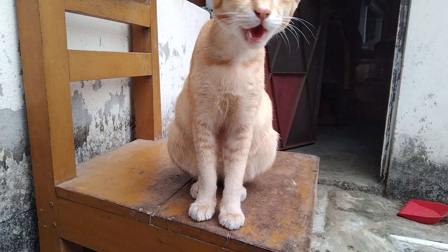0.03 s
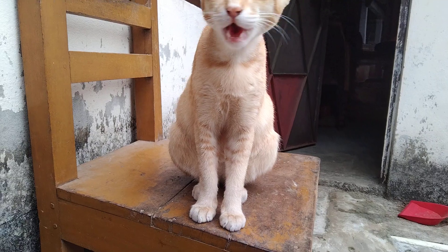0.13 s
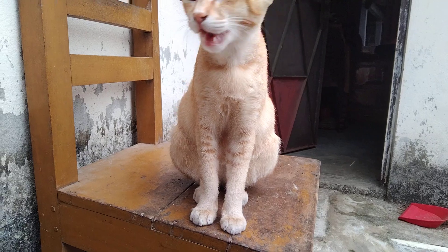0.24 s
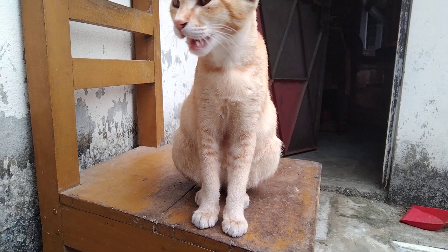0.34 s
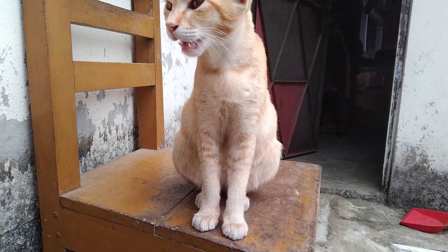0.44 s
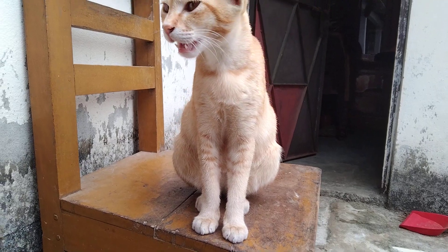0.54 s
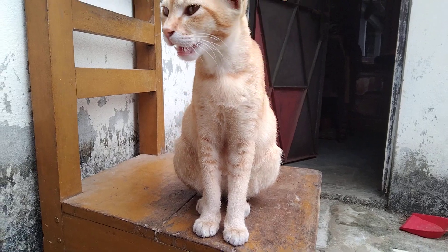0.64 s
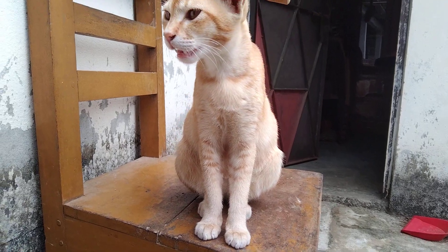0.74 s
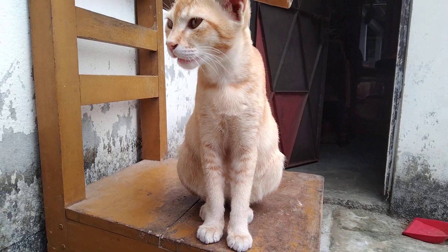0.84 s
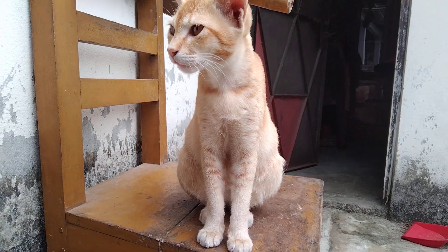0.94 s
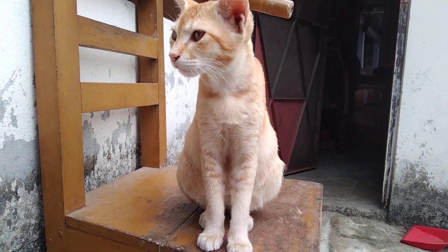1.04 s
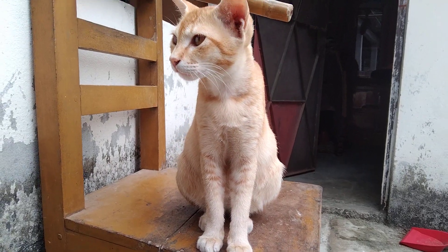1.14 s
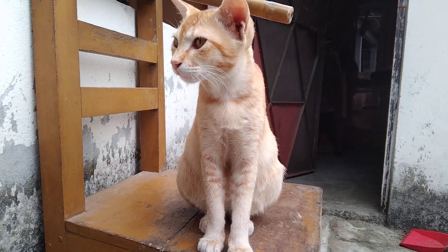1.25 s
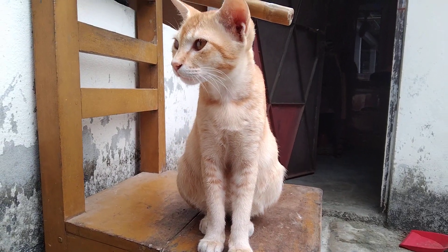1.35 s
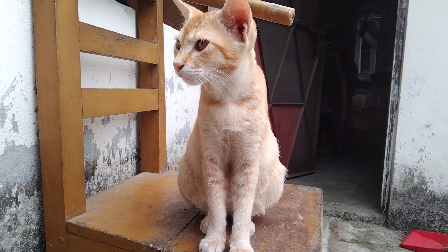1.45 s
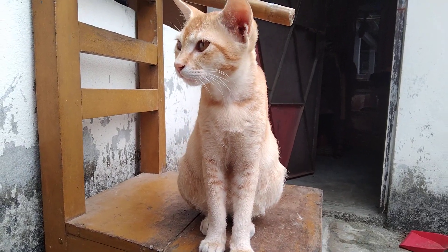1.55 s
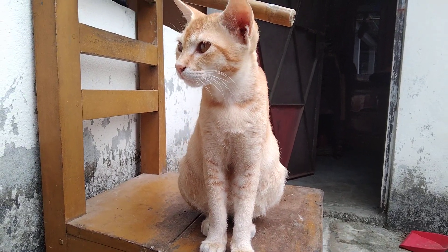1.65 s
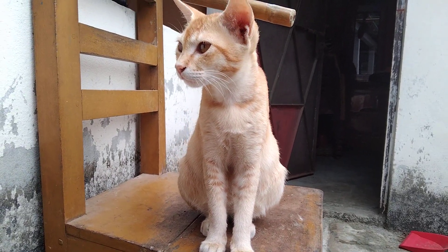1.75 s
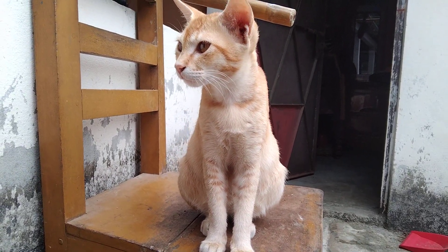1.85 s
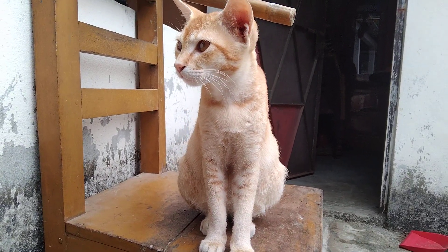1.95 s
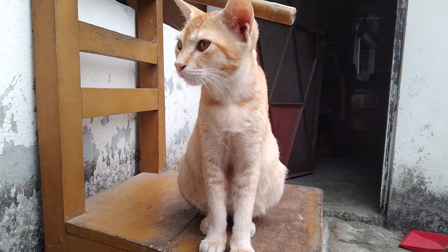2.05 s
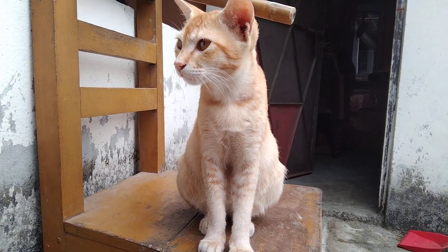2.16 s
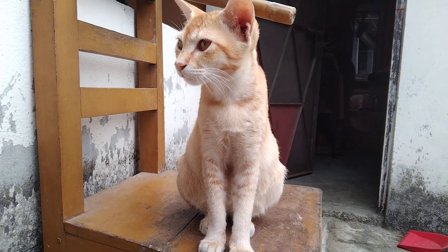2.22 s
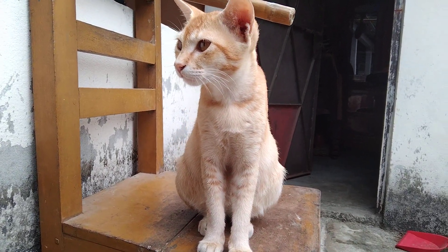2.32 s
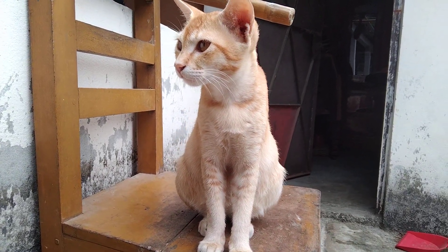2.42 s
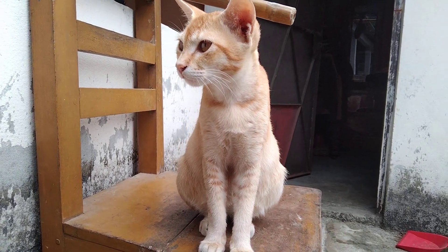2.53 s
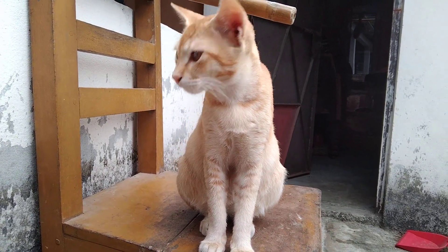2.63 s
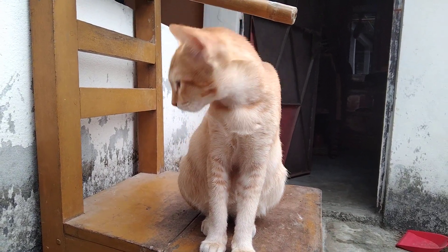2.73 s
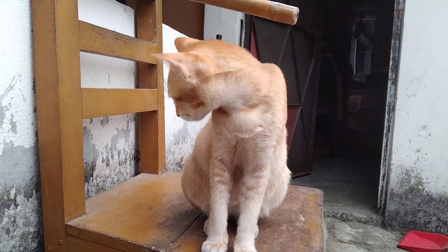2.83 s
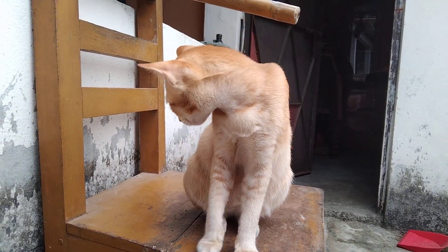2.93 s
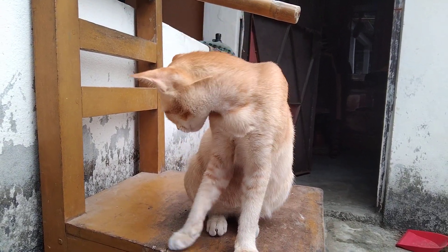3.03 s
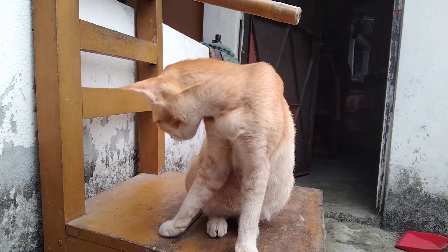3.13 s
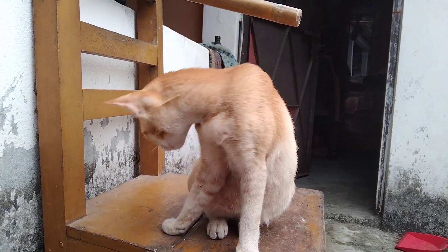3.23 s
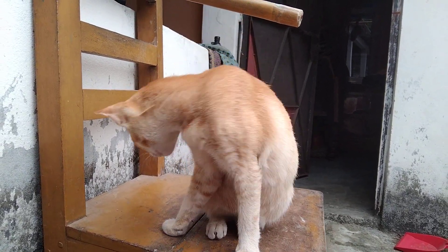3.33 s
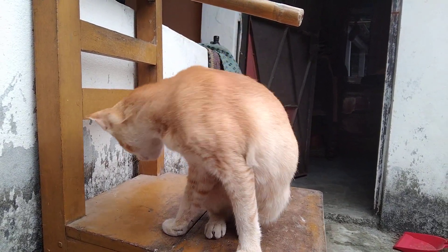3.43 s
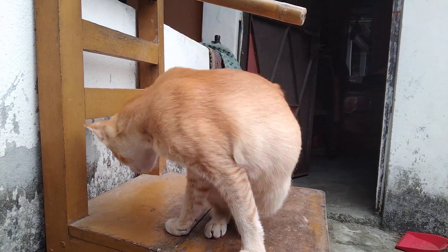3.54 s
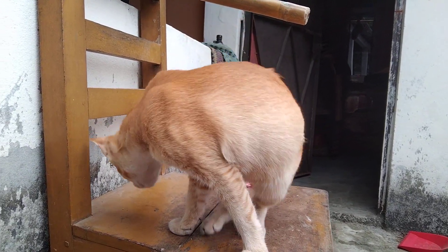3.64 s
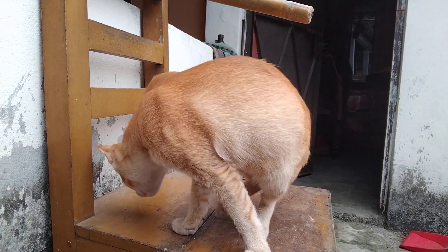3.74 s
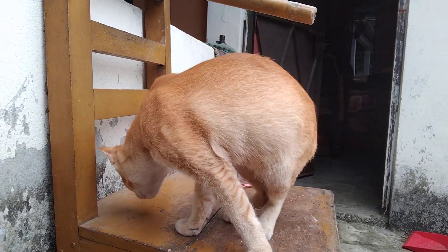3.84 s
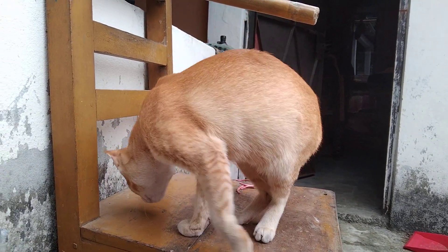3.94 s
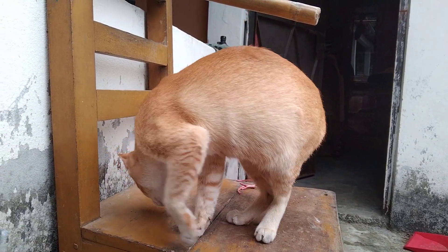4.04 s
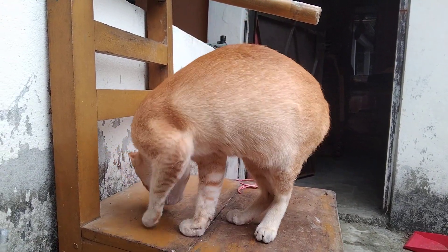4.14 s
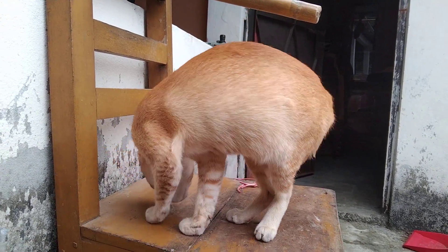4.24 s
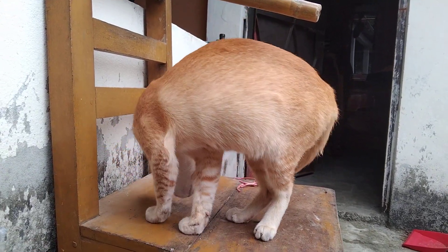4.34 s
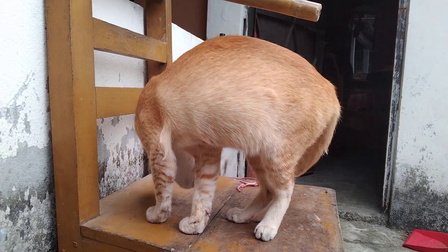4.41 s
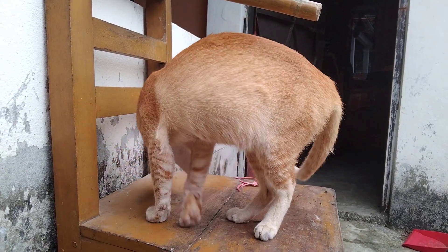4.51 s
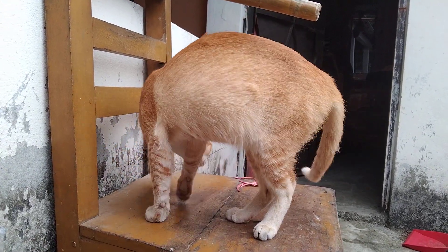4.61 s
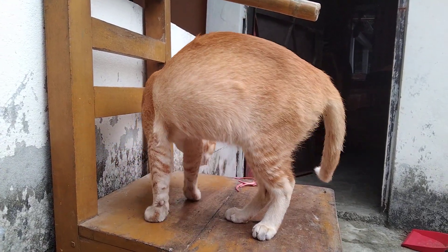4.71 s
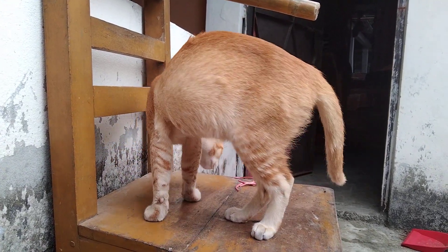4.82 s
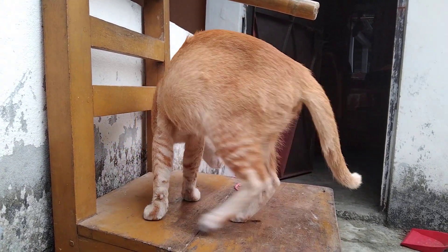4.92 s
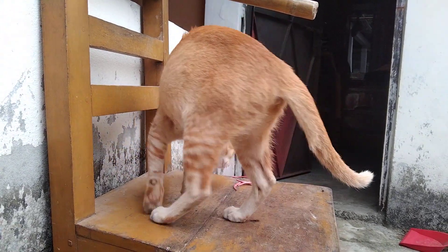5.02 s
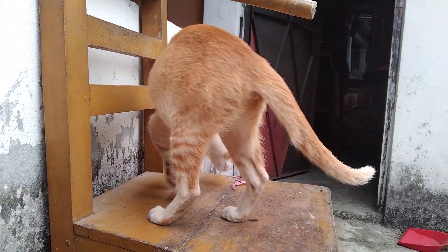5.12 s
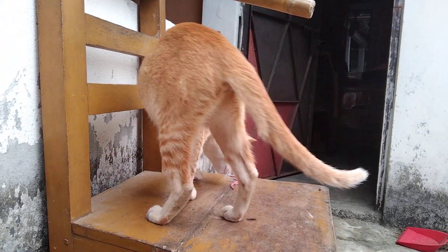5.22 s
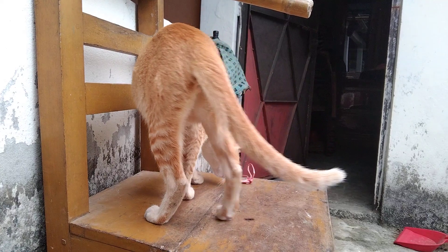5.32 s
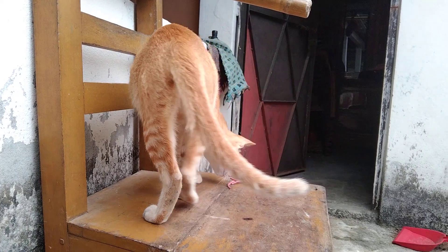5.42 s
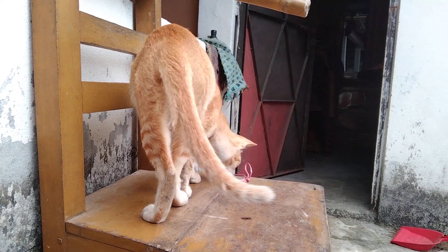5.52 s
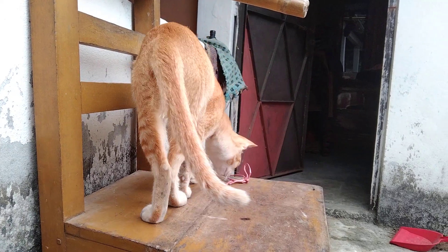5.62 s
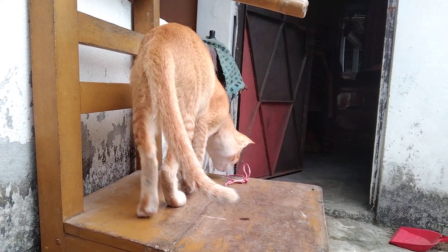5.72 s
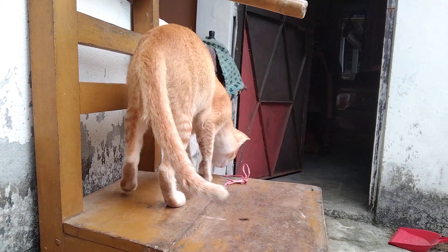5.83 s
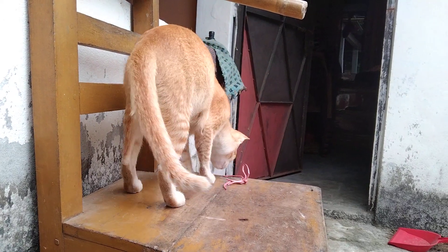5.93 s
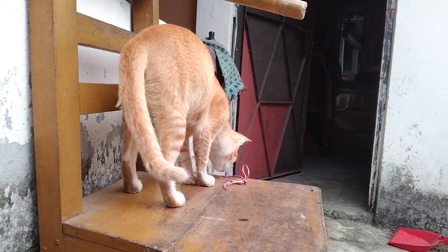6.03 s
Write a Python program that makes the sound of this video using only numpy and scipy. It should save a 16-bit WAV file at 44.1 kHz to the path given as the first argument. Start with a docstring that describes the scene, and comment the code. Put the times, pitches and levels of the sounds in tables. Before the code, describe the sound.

From 0 to 0.85 s a cat close to the microphone meows once: a voiced, mid-high tone around 550 to 615 Hz that rises slightly, then falls, roughens midway, carries some airy hiss and stops abruptly with a short concrete-yard echo. Throughout, a dense insect chorus fills the treble, a bright grainy hiss with fast throbbing, surging at first, sinking until about 4.4 s and then partly recovering. A soft wooden tap comes at 1.6 s, with much fainter ones at 2.0, 2.5 and 4.5 s; dull low paw thuds land at 3.5 and 3.9 s. Faint, blurred gliding animal calls drift in from 1.4 s onward, some high ones near 1.9 and 5.7 s. Between 4.0 and 5.5 s a distant bird rasps six times, about four per second. Thin noise streaks flicker, and a quiet motor hums and rumbles low. Mono phone sound, with the extreme top cut, ends around 6 s.

```python
"""A cat on a wooden chair in a concrete yard meows once, close to a phone: voiced partials and hissing air.
A dense chorus of insects, made of merged clicks, hisses and throbs in the treble; it sinks, then partly recovers.
Far animals call faintly as blurred gliding tones; a far bird rasps six times in smeared bands.
Paws tap and thud on the seat; thin streaks of noise come and go; a motor hums and rumbles low.
The phone has one microphone, so both channels are the same."""
import sys
import numpy as np
from scipy import signal
from scipy.fft import rfft, irfft, next_fast_len
from scipy.io import wavfile
from scipy.ndimage import uniform_filter1d

SR = 44100
rng = np.random.default_rng(int(sys.argv[2]) if len(sys.argv) > 2 else 0)


def persist_wave(psi):
    """Save psi, clipped to +-1, as 16-bit WAV."""
    counts = np.round(np.clip(psi, -1, 1) * 32767).astype(np.int16)
    wavfile.write(sys.argv[1], SR, np.atleast_2d(counts).T)


N = 267687
M = next_fast_len(N)
GRID_HZ = np.maximum(np.arange(M // 2 + 1) * SR / M, 1)

# How the cat shapes its voice:
# (time [s], effort [dB], mouth resonance [Hz], brightness [dB per partial])
MEOW_SHAPE = [(0, -60, 2240, 2), (.043, -49, 2350, -1), (.188, -43.5, 2435, -3), (.266, -40, 2600, -5.5),
              (.357, -48, 2440, -3.5), (.414, -45, 2170, 2.5), (.5, -46, 2086, 1.9),
              (.58, -43.5, 1965, 1.6), (.65, -45, 2003, 1.6), (.71, -45, 1860, 0.5),
              (.765, -48.5, 1800, 1.5), (.79, -51, 1677, 1.5), (.85, -46.5, 1463, 6)]


def undb(db):
    """Turn decibels into an amplitude factor."""
    return 10 ** (np.asarray(db) / 20)


def unit(x):
    """Scale to rms 1."""
    return x / np.sqrt(np.mean(x ** 2))


def columns(table, t):
    """Each column of a table, read at the times t."""
    s, *rest = np.transpose(table)
    return [np.interp(t, s, c) for c in rest]


def colour(x, points):
    """Shape a sound by (Hz, dB) points joined on a log-frequency axis."""
    hz, db = np.transpose(points)
    gain = undb(np.interp(np.log(GRID_HZ), np.log(hz), db))
    return irfft(rfft(x, M) * gain, M)[:N]


def walk(rate, size=N):
    """Random levels held 1 / rate s and slewed twice; rms 1."""
    k = max(int(SR / rate), 1)
    steps = np.repeat(rng.standard_normal(size // k + 1), k)
    slewed = uniform_filter1d(uniform_filter1d(steps, k), k)
    return unit(slewed[:size])


def waver(width, size):
    """Random size and phase that spread a tone over about this many Hz."""
    return walk(width, size=size) + 1j * walk(width, size=size)


def add(track, start_s, sound):
    """Mix a short sound in at its time."""
    i = int(start_s * SR)
    track[i:i + len(sound)] += sound[:len(track) - i]


def meow():
    """Partials on one gliding pitch flutter where the voice is rough; air hisses past; the throat shuts fast."""
    # pitch of the voice: (time [s], pitch [Hz])
    pitch = [(0, 554), (.045, 577), (.085, 584.5), (.13, 585.5), (.24, 615.5), (.275, 617), (.33, 603),
             (.435, 570), (.49, 563.5), (.56, 562), (.65, 565), (.74, 552), (.81, 562), (.85, 552)]
    # spectrum of the hissing breath: (frequency [Hz], relative level [dB per Hz])
    air_colour = [(350, -40), (500, -12.5), (680, -41.5), (900, -40), (1300, -12), (2000, -8), (3000, -1),
                  (3600, -16), (5000, -62)]
    clear, hoarse = .025, .12  # roughness, 0-1
    hoarse_from_s, hoarse_to_s, hoarse_edge_s = .33, .48, .05
    air_levels_db = (-51.5, -55.5, -53)  # start, middle and end of the call
    air_dies_db, air_dies_s, air_dies_bend = -11.5, 0.093, 1.7  # fall after this long, its curvature

    end_s = MEOW_SHAPE[-1][0]
    t = np.arange(int(end_s * SR)) / SR
    hz = uniform_filter1d(columns(pitch, t)[0], size=SR // 45)
    phase = 2 * np.pi * np.cumsum(hz) / SR
    inside_s = np.minimum(t - hoarse_from_s, hoarse_to_s - t)
    rough = clear + (hoarse - clear) * np.clip(.5 + inside_s / hoarse_edge_s, 0, 1)
    gust = undb(3.7 * walk(25, size=len(t)))  # a hoarse edge on the upper partials comes in gusts
    voice = 0
    for k, db in enumerate(partials(t, hz), 1):
        flutter = rough * min(k / 4, 1) * waver(250, len(t))
        flutter = flutter + 0.036 * (k > 2) * gust * waver(500, len(t))
        voice = voice + np.sqrt(2) * undb(db) * np.imag((1 + flutter) * np.exp(1j * k * phase))
    out = np.zeros(N)
    add(out, 0, voice * np.clip((t[-1] - t) / 0.0037, 0, 1))

    now = np.arange(N) / SR
    air_db = np.interp(now, [0, end_s / 2, end_s], air_levels_db)
    air_db = air_db + air_dies_db * (np.clip(now - end_s, 0, 1) / air_dies_s) ** air_dies_bend
    hiss = unit(colour(rng.standard_normal(N), air_colour))
    return out + undb(air_db + 3.0 * walk(40)) * hiss


def partials(t, hz):
    """Levels [dB] of partials 1-6: effort and brightness, shaped by a moving mouth resonance."""
    # the fundamental: (time [s], level [dB])
    lowest = [(0, -54), (.12, -51), (.2, -47.5), (.3, -47), (.44, -55.5), (.85, -60.5)]
    throat_db, mouth_width_hz = (-0.9, 0, -6.5, 6), 370  # partials 2-5 before the mouth
    dip_s, dip_width_s, dip_db = .362, .024, -14  # partial 3 dips briefly
    sixth_db, sixth_rise_s = -42.5, 0.059  # partial 6 shows early, then fades
    sixth_fade_db_s, sixth_rest_db = 108.5, -62.5
    shut_s, shut_db = 0.0068, (-35, -34, -54, -65, -42, -70)  # click as the throat shuts, partials 1-6

    effort_db, mouth_hz, bright_db = columns(MEOW_SHAPE, t)
    levels = columns(lowest, t)
    for k, db in enumerate(throat_db, 2):
        ratio = k * hz / mouth_hz
        damping = ratio * mouth_width_hz / mouth_hz
        mouth_db = -20 * np.log10((1 - ratio ** 2) ** 2 + damping ** 2)
        levels.append(effort_db + db + bright_db * (k - 3) + mouth_db)
    levels[2] = levels[2] + dip_db * np.exp(-((t - dip_s) / dip_width_s) ** 2)
    faded_s = sixth_rise_s + (sixth_db - sixth_rest_db) / sixth_fade_db_s
    levels.append(np.interp(t, [0, sixth_rise_s, faded_s], [sixth_rest_db, sixth_db, sixth_rest_db]))
    shut = np.clip(1 - (t[-1] - t) / shut_s, 0, 1)
    return [db + shut * (last_db - db) for db, last_db in zip(levels, shut_db)]


def yard(x):
    """Concrete returns one smeared echo from the near wall and a short diffuse tail."""
    tail_t60_s, tail_db = .45, -27
    wall_s, wall_smear_s, wall_db = .04, .008, -19
    t = np.arange(SR // 2) / SR
    tail = rng.standard_normal(len(t)) * undb(-60 * t / tail_t60_s) * (t > .01)
    wall = rng.standard_normal(len(t)) * np.exp(-((t - wall_s) / wall_smear_s) ** 2)
    echoes = 0
    for part, db in ((tail, tail_db), (wall, wall_db)):
        echoes = echoes + undb(db) * part / np.sqrt(np.sum(part ** 2))
    return x + signal.fftconvolve(x, echoes)[:N]


def taps():
    """A paw lands softly: the seat rings briefly in damped modes and a dull rustle follows."""
    # soft taps on the chair: (time [s], seat level [dB], rustle level [dB])
    paw_taps = [(1.588, -52, -69), (1.999, -71, -89), (2.52, -64, -79), (4.53, -77, -87)]
    # ringing modes of the wooden seat: (frequency [Hz], relative level [dB], T60 [s])
    chair = [(420, 4, .05), (720, 3, .03)]
    out, t = np.zeros(N), np.arange(SR // 5) / SR
    seat = sum(undb(db - 60 * t / t60) * np.sin(2 * np.pi * hz * t) for hz, db, t60 in chair)
    for s, db, rustle_db in paw_taps:
        band = np.real(waver(400, len(t)) * np.exp(2j * np.pi * 520 * t))
        rustle = undb(rustle_db - 60 * t / 0.3) * band
        add(out, s, (undb(db) * seat + rustle) * np.minimum(t / 0.0031, 1))
    return out


def thuds():
    """The whole seat gives a dull low bump, one damped tone, under the cat's weight."""
    # soft low thuds of paws on the seat: (time [s], level before rise and decay [dB])
    paw_thuds = [(3.5, -51), (3.92, -50)]
    thud_hz, rise_s, t60_s = 140, 0.013, 0.24
    out, t = np.zeros(N), np.arange(SR // 4) / SR
    bump = np.minimum(t / rise_s, 1) * np.sin(2 * np.pi * thud_hz * t)
    for s, db in paw_thuds:
        add(out, s, undb(db - 60 * t / t60_s) * bump)
    return out


def chorus():
    """Insect clicks merge to a hiss, made as spiky noise; groups at each pitch throb together and alone."""
    # course of the chorus:
    # (time [s], level [dB], extra around 9 kHz [dB], extra above about 12 kHz [dB])
    course = [(0, -35, 1.5, 3), (2.7, -39, 1.5, 3), (2.75, -40, 1, 2.5), (4.43, -41.5, -1, 1.5),
              (6.07, -38.5, -3.5, 1)]
    # spectrum of the hiss: (frequency [Hz], relative level [dB per Hz])
    hiss_colour = [(2600, -52.5), (3200, -40.5), (3600, -14), (4700, -1.5), (5600, -2), (6400, 4.5),
                   (7100, 1), (8000, 2.5), (9400, -3.5), (10500, -16), (11200, -26), (11900, -26.5),
                   (12500, -20.5), (15500, -8)]
    surge_hz, surge_db, surge_peak_s, surge_fade_s = 6.8, 2.5, .07, 0.29  # surges in step at first

    t = np.arange(N) / SR
    db, mid_db, top_db = columns(course, t)
    surge = np.exp(-(t / surge_fade_s) ** 2) * np.cos(2 * np.pi * surge_hz * (t - surge_peak_s))
    db = db + surge_db * surge
    clicks = rng.standard_normal(N) * undb(1.7 * rng.exponential(size=N))
    spectrum = rfft(unit(colour(clicks, hiss_colour)), M)
    octave = np.log2(GRID_HZ / 2000)
    beat = np.sin(2 * np.pi * 17.5 * t + 2.0 * walk(2.4))
    throb_db = .5 * walk(35) + 0.25 * walk(11) + .5 * beat
    out = 0
    for k in range(1, 19):
        # sixth-octave groups that overlap to a flat sum
        group = irfft(spectrum * np.clip(1 - np.abs(6 * octave - k), 0, 1), M)[:N]
        tilt_db = mid_db * np.clip(1 - abs(k - 13) / 4, 0, 1) + top_db * (k > 15)
        out = out + group * undb(tilt_db + throb_db + 0.93 * walk(9))
    return out * undb(db)


def far_calls():
    """Each call arrives by many paths: a gliding tone that wavers within its width, a blur above it."""
    # faint far calls, blurred by walls: (time [s], length [s], rise [s], first pitch [Hz],
    # last pitch [Hz], width [Hz], relative level at the peak [dB])
    calls = [(1.411, .38, 0.033, 1640, 1726, 146, -65.5), (1.408, 0.44, .08, 2236, 2465, 287, -64.5),
             (1.422, .2, .04, 2720, 2750, 99, -71), (1.504, 0.21, .07, 1210, 1170, 80, -73.5),
             (1.843, 0.27, 0.15, 4300, 4190, 202, -49), (1.889, 0.23, 0.091, 2380, 2400, 403, -71),
             (2.12, 0.39, .1, 2395, 2170, 120.6, -59.5), (2.412, 0.35, 0.14, 3180, 2950, 252, -54.5),
             (2.471, 0.32, 0.086, 2840, 2690, 302, -64), (2.668, .12, .03, 2300, 2290, 150, -77),
             (2.73, .27, .05, 1298, 1300, 78, -69), (2.82, 0.2, 0.042, 2550, 2500, 59.7, -80),
             (3.0, 0.17, .07, 2620, 2490, 150, -73), (3.51, .18, 0.037, 920, 922, 80, -79),
             (3.512, .15, 0.025, 2450, 2490, 302, -68.5), (3.631, 0.26, .12, 1385, 1226, 198, -66),
             (3.689, .33, .2, 2090, 2470, 297, -69.5), (3.707, 0.43, 0.025, 3100, 3060, 298, -76),
             (3.87, .09, 0.028, 1130, 1100, 200, -73.5), (4.13, .19, 0.038, 1420, 1374, 80, -71.5),
             (4.123, 0.15, 0.035, 1020, 1030, 100, -82), (4.735, .25, .05, 1315, 1270, 78.4, -66),
             (5.37, 0.32, 0.085, 3680, 3470, 124, -55.5), (5.618, .17, .03, 1900, 2080, 100, -79.5),
             (5.62, 0.26, 0.034, 2350, 2550, 295, -76), (5.638, 0.31, 0.11, 4190, 4060, 101, -48),
             (5.854, .4, 0.11, 2326, 2210, 150, -58)]
    start_db, end_db = -9.5, -17  # relative to the peak
    settle_s = .08  # time constant of the glide
    out = np.zeros(N)
    for s, length, rise, first_hz, last_hz, width, peak_db in calls:
        t = np.arange(int(length * SR)) / SR
        hz = last_hz + (first_hz - last_hz) * np.exp(-t / settle_s)
        tone = np.exp(2j * np.pi * np.cumsum(hz) / SR)
        db = peak_db + np.interp(t, [0, min(rise, .9 * length), length], [start_db, 0, end_db])
        shape = undb(db) * signal.windows.tukey(len(t), .15)
        blur = undb(-11.5) * waver(2.9 * width, len(t)) * np.exp(2j * np.pi * 1.4 * width * t)
        paths = .6 + 0.9 * waver(width, len(t)) + blur
        add(out, s, shape * np.real(paths * tone))
    return out


def rasping_bird():
    """Short hoarse cries: each partial is smeared to a falling band, and the walls draw it out."""
    # far rasping calls: (time [s], relative level [dB], extra in partial 3 [dB],
    # extra in partial 6 [dB], blur [0-1])
    rasps = [(4.045, -52, 8.5, 3, 0), (4.3052, -47, 0.5, -4, 0.22), (4.545, -48.5, 4, -3, 0.05),
             (4.777, -50, 5.5, -10, 0.27), (4.9922, -48, -20, -5, 0.7), (5.2216, -50, 4, -12, 0.05)]
    # partials 3-6: (starting frequency [Hz], relative level [dB])
    rings = [(1600, -4), (2080, 4), (2600, 2), (3150, 1.5)]
    hold_s, t60_s, lowest_hz = 0.042, 0.53, 1350  # decay of partial 3; the higher ones die faster
    out, t = np.zeros(N), np.arange(int(.3 * SR)) / SR
    decay = undb(-60 * np.maximum(t - hold_s, 0) / t60_s)
    shape = np.minimum(t / 0.0053, 1) * decay * np.clip((.26 - t) / 0.063, 0, 1)
    for s, db, low_db, high_db, blur in rasps:
        for k, (hz, ring_db) in enumerate(rings):
            extra_db = (low_db, 0, 0, high_db)[k]
            smear = waver(450 + 800 * np.clip(blur, 0, 1), len(t))
            band = np.real(smear * np.exp(2j * np.pi * hz * (t - 0.087 * t ** 2)))
            level = undb(db + ring_db + extra_db - 16.5)
            add(out, s, level * shape ** (1 + 0.17 * k) * band)
    return signal.sosfilt(signal.butter(6, lowest_hz, "high", fs=SR, output="sos"), out)


def patches():
    """Narrow streaks of noise under the chorus come and go, each on its own."""
    # faint streaks: (frequency [Hz], base level [dB])
    streaks = [(400, -87.5), (560, -103), (700, -120), (1800, -120), (2000, -104), (2300, -98.5),
               (2600, -84), (2900, -97), (3100, -87), (3400, -81.5)]
    # shared swell of the streaks above 1 kHz: (time [s], level [dB])
    swell = [(0, -2), (1.6, 5), (2.7, 6), (2.9, -4), (5.35, -2), (5.5, -13), (5.75, -17), (5.9, 13.5)]
    come_db, rate_hz = 13, 10  # how far and how often a streak comes and goes
    out, t = 0, np.arange(N) / SR
    swell_db, = columns(swell, t)
    for hz in [430, 540, *range(1950, 3500, 140)]:
        base_db = np.interp(hz, *np.transpose(streaks))
        db = base_db + swell_db * (hz > 1000) + come_db * np.tanh(2 * walk(rate_hz) - 1)
        out = out + undb(db) * np.real(waver(200, N) * np.exp(2j * np.pi * hz * t))
    return out


def motor():
    """Low rumble, made of coloured noise, with three slightly wavering hum lines."""
    # the lowest hum line: (time [s], level [dB])
    low_hum = [(0, -63), (.45, -65), (.8, -57), (1.9, -59.5), (2.25, -75), (2.55, -61), (3.35, -69),
               (3.96, -60.5), (5.5, -62.5), (6.07, -65.5)]
    # spectrum of the rumble: (frequency [Hz], relative level [dB per Hz])
    rumble_colour = [(25, -29), (50, -26.5), (85, -7), (122, -0.5), (221, -9.5), (330, -14), (500, -45),
                     (800, -40), (2200, -42), (3000, -73.5)]
    hum_hz, rumble_db = (113.6, 175, 274.5), -64
    high_hums_db, hold_s, fade_db_s = (-74, -67), 2.67, 3  # the upper two lines hold, then fade
    t = np.arange(N) / SR
    fade_db = fade_db_s * np.maximum(t - hold_s, 0)
    levels = columns(low_hum, t) + [db - fade_db for db in high_hums_db]
    hum = 0
    for hz, db in zip(hum_hz, levels):
        line = np.sin(2 * np.pi * hz * t + 0.42 * walk(17))
        hum = hum + undb(db + 1.73 * walk(2.2)) * line
    return hum + undb(rumble_db) * unit(colour(rng.standard_normal(N), rumble_colour))


def scene():
    """The cat in its yard and on its chair, the far animals and the motor, at one microphone."""
    cat = yard(meow()) + taps() + thuds()
    background = chorus() + far_calls() + rasping_bird() + patches() + motor()
    mono = cat + background
    return np.array([mono, mono])


def record(dry):
    """The phone cuts the top with a steep low-pass."""
    top_hz = 15480
    return signal.sosfilt(signal.ellip(16, .2, 80, top_hz, fs=SR, output="sos"), dry)


dry = scene()
out = record(dry)
persist_wave(out)
```